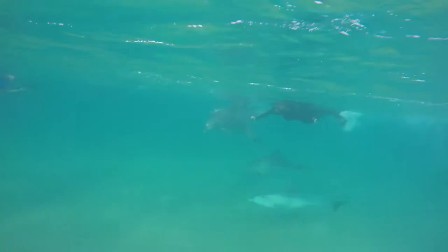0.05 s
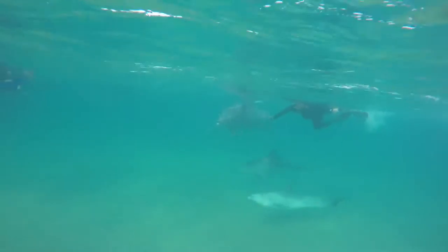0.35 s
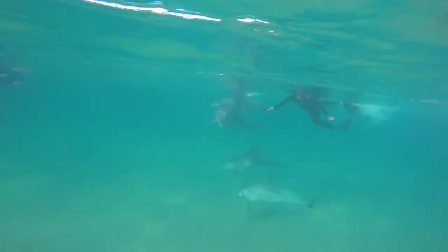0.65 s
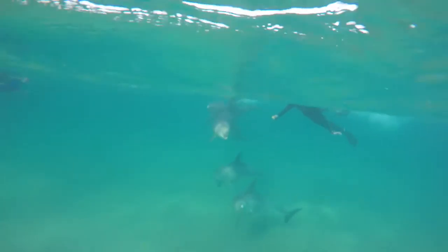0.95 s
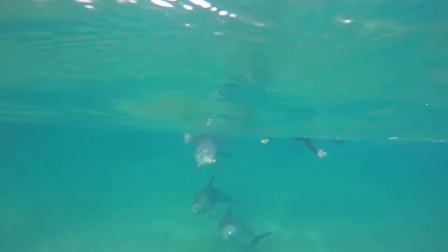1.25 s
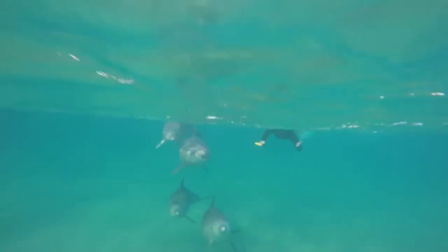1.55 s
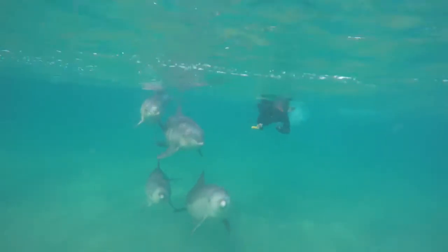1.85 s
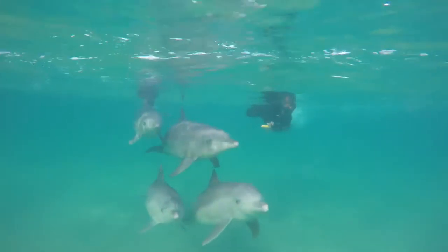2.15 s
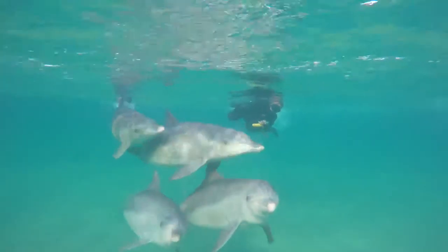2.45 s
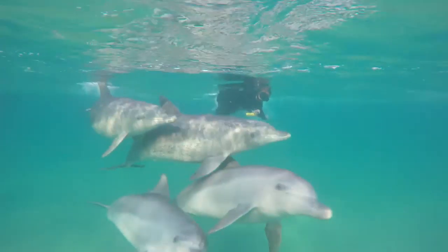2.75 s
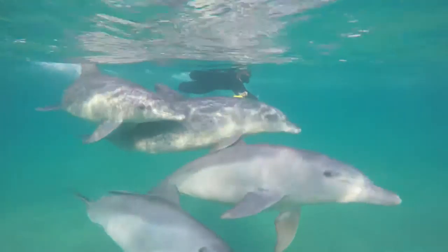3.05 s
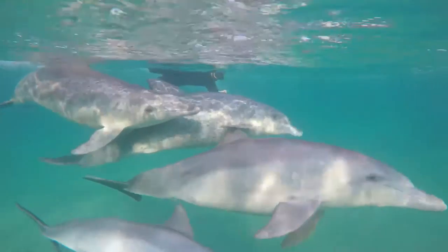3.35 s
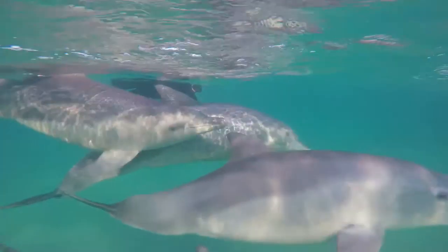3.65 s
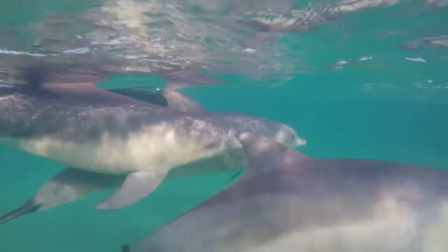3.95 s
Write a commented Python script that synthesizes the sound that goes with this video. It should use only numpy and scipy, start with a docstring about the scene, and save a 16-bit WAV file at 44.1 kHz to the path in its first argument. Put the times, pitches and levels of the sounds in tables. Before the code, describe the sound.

Dolphins click underwater over a steady low rumble and fine crackle. Bubbles plink close by around 0.8 seconds, then distant clicks and a thin whistle start near 1. From 1.4 a near click train builds, quickening into a buzz and stopping at 2.4, with a knock and gulping water at 1.8. A short squeak comes at 2.6; small bubbles and dull knocks follow around 3.5.

```python
"""First come a low rumble, a rush of water and a fine crackle, heard through a housing just under the sea
surface. Bubbles plink and gulp close by, each a pocket of air ringing at its own resonance. Dolphins
click far off, with a thin whistle; then a near one scans the housing with a train of pulses that speeds
up to a buzz and stops. A short squeak follows, and the water gurgles on."""
import sys
import numpy as np
from scipy import signal
from scipy.fft import rfft, irfft
from scipy.io import wavfile
from scipy.ndimage import map_coordinates

SR = 44100
rng = np.random.default_rng(int(sys.argv[2]) if len(sys.argv) > 2 else 0)


def inscribe(sig):
    """Save sig as 16-bit PCM at rate SR to the path in sys.argv[1].

    A 1-D sig is mono; a 2-D sig holds one channel per row.
    Samples are clipped to [-1, 1] before scaling.
    """
    pcm = np.round(np.clip(np.atleast_2d(sig).T, -1, 1) * 32767)
    wavfile.write(sys.argv[1], SR, pcm.astype(np.int16))


N = 176400
T = np.arange(N) / SR

# The near dolphin's pace. Each row: time in seconds, clicks per second.
CLICK_RATE = [(1.4, 105.3), (1.48, 113.6), (1.62, 111.0), (1.72, 101.8), (1.81, 98.4), (1.9, 107.8),
              (2.0, 122.9), (2.1, 148.1), (2.2, 178.7), (2.25, 189.4), (2.29, 189.1), (2.345, 179.5),
              (2.39, 134.4)]
# Its loudness as the beam finds the housing. Each row: time in seconds, level in dB.
BEAM_LEVEL = [(1.38, -70), (1.45, -59), (1.58, -56), (1.8, -54.5), (2.05, -49), (2.29, -47.5),
              (2.37, -51.5), (2.395, -71)]
# A click heard through the housing. Each row: frequency in Hz, relative density in dB.
CLICK_SPECTRUM = [(1200, -40), (1600, -23), (2100, -19), (2700, -3.5), (3300, 4), (3800, 9), (4450, -0.5),
                  (5000, -9.5), (5800, -7.5), (7400, -15), (8800, -18), (10500, -17.5), (12600, -23),
                  (14000, -17), (15500, -17)]
# Echoes of each click. Each row: delay in seconds, gain in dB.
ECHOES = [(.0013, -6), (.00235, -11), (.00325, -15)]
# Treble lobes of the beam. Each row: middle and width in seconds, frequency in Hz, level in dB.
BEAM_LOBES = [(2.16, 0.061, 9200, -80), (2.02, 0.084, 13850, -78)]
# Distant dolphins. Each row: time in seconds, clicks per second, level in dB.
FAR_CLICKS = [(.85, 81, -73), (1.0, 82, -56.5), (1.36, 85, -58.5), (1.81, 150, -51.5), (2.0, 130, -59),
              (2.3, 98, -55.5)]
# Their timbre. Each row: frequency in Hz, relative density in dB.
FAR_SPECTRUM = [(1250, -31), (1410, 1), (1550, 5), (2190, -4), (2390, 2.5), (3800, 4.5), (4950, -9.5),
                (5790, -8), (7550, -19.5), (15000, -24)]
# Pitch contours. Each row: time in seconds, frequency in Hz, base level in dB.
WHISTLE = [(.95, 5775, -92), (1.0, 5757, -61), (1.15, 5760, -65), (1.45, 5760, -77)]
SQUEAK = [(2.56, 2005, -71), (2.595, 1790, -54), (2.635, 1910, -58)]
BIG_BUBBLE = [(1.80, 139.4, -40), (1.84, 154.3, -27.5), (1.865, 157, -27), (1.89, 176, -30),
              (1.925, 194, -37.5), (1.98, 215, -59)]
FAINT_TONE = [(1.66, 726, -53.5), (1.8, 876, -56), (1.9, 829, -54)]
# Near bubbles, and snaps of the tiniest. Each row: start in seconds, peak in dB, frequency in Hz.
BUBBLES = [(.315, -56, 1503), (0.3285, -42.5, 3780), (0.354, -45.5, 3980), (0.416, -43.5, 3930),
           (.575, -43, 850), (0.7536, -26.5, 1557), (.755, -34.5, 520.6), (.783, -30, 534),
           (0.793, -47, 2760), (0.821, -48, 1500), (0.8383, -26.5, 2640), (0.8653, -36.5, 1570),
           (0.888, -41, 1490), (.895, -39, 3750), (0.904, -45.5, 3300), (0.918, -39, 3150),
           (0.989, -41, 3700), (2.961, -39, 2400), (3.3546, -46.5, 3170), (3.4062, -43, 2680),
           (3.4186, -48.5, 1565), (3.459, -49, 2640), (3.4728, -47.5, 1790), (3.5294, -49, 2360),
           (3.8915, -48, 2760), (3.937, -47.5, 3630)]
SNAPS = [(.053, -36.5, 5470), (0.7402, -41.5, 7760), (.761, -53, 7650), (.808, -50, 7000),
         (0.84, -51, 8900), (3.138, -47, 6000)]
# An air pocket. Each row: start in seconds, peak in dB, frequency in Hz, T60 and rise in seconds.
GULPS = [(1.787, -24, 578, 0.098, 0.0027), (1.829, -27.5, 664, 0.054, 0.0043),
         (1.87, -32, 650, 0.04, 0.0033), (1.896, -32, 671, 0.11, 0.0086), (1.947, -35, 660, 0.042, 0.0045),
         (2.1, -34.5, 601.3, .17, 0.017), (2.285, -42.5, 612, 0.15, 0.015), (2.38, -46.5, 615, 0.52, 0.012)]
# Knocks on the housing. Each row: start in seconds, peak in dB, frequency in Hz, T60 in seconds.
KNOCKS = [(.836, -37.5, 253, 0.087), (1.786, -17.5, 150, 0.024), (3.4625, -27.5, 294, 0.013),
          (3.581, -22, 82, 0.15)]
# Rushes of water. Each row: start and length in seconds, body and froth levels in dB before the sag.
CHURNS = [(0, 0.35, -42, -68), (0.742, 0.26, -39.5, -52), (1.772, 0.855, -37, -63), (3.358, 0.38, -53, -59)]
# Surges of water. Each row: middle in seconds, peak in dB, frequency in Hz, width in seconds.
SURGES = [(.624, -13.5, 27.3, 0.036), (0.72, -13, 47.4, 0.0094), (0.859, -17.5, 26.8, 0.027),
          (2.13, -20.5, 63.3, 0.023)]
# Spectra of the water's noises. Each row: frequency in Hz, relative density in dB.
CHURN_SPECTRUM = [(110, 8), (170, 0.5), (250, -5.5), (340, -3.5), (480, -11), (560, -2), (615, 7),
                  (690, -8.5), (790, -14.5)]
RUMBLE_SPECTRUM = [(15, 5.5), (65, -3.5), (118, -17), (162, -34), (194, -30), (273, -42.5), (450, -54)]
SLOSH_SPECTRUM = [(200, -4), (450, -4.5), (620, 5.5), (850, -2.5), (1000, -17), (1250, -44.5)]
FIZZ_SPECTRUM = [(590, -47), (1000, -7), (1360, -12), (1540, -2), (2190, -12), (2420, -1.5), (3110, -5),
                 (3890, -5.5), (4940, -16.5), (5860, -14), (7100, -20.5), (13200, -22), (15000, -29)]
# Their envelopes. Each row: time in seconds, gain in dB.
RUMBLE_LEVEL = [(0, -30.5), (.5, -27), (.85, -23.5), (1.4, -28), (3.2, -29), (4, -33.5)]
SLOSH_LEVEL = [(0, -61), (.6, -56), (1.75, -56.5), (2.7, -59), (2.85, -53), (3.4, -51), (4, -55)]
FIZZ_LEVEL = [(0, -55), (.55, -57), (.9, -52), (1.3, -55.5), (2.8, -56), (3.4, -53.5), (3.75, -55.5)]


def near_dolphin():
    """Multipath interference: delayed copies colour each click, and shift as the dolphin nears and turns."""
    start_s, closest_s, ring_hz = 1.3787, 2.3, 2802
    train = pulses(curve(CLICK_RATE) * (T > start_s))
    dull = signal.sosfiltfilt(signal.butter(2, 5560, fs=SR, output="sos"), train)
    treble = train - dull
    away_s = np.maximum(closest_s - T, 0)
    echoes = sum(amp(db) * delayed(dull, delay * (1 + .07 * away_s * drift(hz=30)))
                 for delay, db in ECHOES)
    # A second path round the housing shortens as the dolphin turns.
    detour = amp(-7) * delayed(treble, .000853 * (1 + .1 * away_s))
    ringing = signal.oaconvolve(train, plink(-28, ring_hz, t60=0.027, rise=1 / ring_hz))[:N]
    smear = amp(-15) * scatter(dull, t60=0.033)
    clicks = unit(filtered(train + detour + echoes + ringing + smear, CLICK_SPECTRUM))
    return level(BEAM_LEVEL) * clicks + beam_lobes(treble)


def beam_lobes(treble):
    """Directivity: narrow treble bands swell and fade as lobes of the beam sweep over the housing."""
    rise_hz_per_s = 1000
    out = np.zeros(N)
    for s, width, hz, db in BEAM_LOBES:
        band = resonate(treble, hz + rise_hz_per_s * (T - s), width_hz=120)
        out += amp(db) * swell(s, width) * unit(band)
    return out


def far_dolphins():
    """Reverberation: scattering in the water smears uneven trains of distant clicks."""
    rate = curve(FAR_CLICKS) * (1 + .03 * drift(hz=27.8))
    train = pulses(rate) * amp(1.8 * drift(hz=49.5))
    smear = amp(7) * scatter(train, t60=0.1)
    return level(FAR_CLICKS) * unit(filtered(train + smear, FAR_SPECTRUM))


def calls():
    """Harmonic series: one partial makes a thin whistle, three fluttering ones a squeak."""
    return tone(WHISTLE, waver_db=0) + tone(SQUEAK, waver_db=7, harmonics_db=(-8, 1, -17))


def bubbles():
    """Bubble resonance: each pinches off with a brief crack, then rings on the springiness of its air."""
    rings, cracks = np.zeros((2, N))
    pinch_s = .002
    pinch = amp(-10) * np.exp(-T[T < 10 * pinch_s] / pinch_s)
    for s, db, hz in BUBBLES:
        add(rings, s, plink(db, hz, t60=63 / hz, rise=4.5 / hz, glide_per_s=.25))
        add(cracks, s, amp(db) * pinch)
    for s, db, hz in SNAPS:
        add(rings, s, plink(db, hz, t60=0.0032, rise=0.00021))
        add(cracks, s, amp(db) * pinch)
    return rings + cracks * noise(FIZZ_SPECTRUM)


def big_bubble():
    """The resonance of a big bubble rises in pitch as it lifts off."""
    return tone(BIG_BUBBLE, waver_db=1, harmonics_db=(0, -16))


def gulps_and_knocks():
    """Damped free vibration: an air pocket gulps at the housing, and knocks on it ring dully."""
    out = np.zeros(N)
    for s, db, hz, t60, rise in GULPS:
        add(out, s, plink(db, hz, t60, rise))
    for s, db, hz, t60 in KNOCKS:
        add(out, s, plink(db, hz, t60, rise=0.0032))
    return out


def churn():
    """Resonant noise and a froth of small bubbles share an envelope: each rush swells, sags and stops."""
    attack_s, release_s, sag_db_per_s = 0.0081, 0.21, 13
    body, froth = np.zeros((2, N))
    for s, length, body_db, froth_db in CHURNS:
        attack = np.clip((T - s) / attack_s, 0, 1)
        release = np.clip((s + length - T) / release_s, 0, 1)
        envelope = attack * release * amp(-sag_db_per_s * (T - s))
        body += amp(body_db) * envelope
        froth += amp(froth_db) * envelope
    return body * noise(CHURN_SPECTRUM) + froth * swarm(per_s=680, band_hz=(1460, 4250), spread_db=3)


def water():
    """Pressure fluctuations: water thuds and surges against the housing and sloshes at the surface."""
    rumble = amp(curve(RUMBLE_LEVEL)) * unit(noise(RUMBLE_SPECTRUM) * amp(2.2 * drift(hz=16)))
    for s, db, hz, width in SURGES:
        rumble += amp(db) * swell(s, width) * np.sin(2 * np.pi * hz * (T - s))
    slosh = amp(curve(SLOSH_LEVEL)) * unit(noise(SLOSH_SPECTRUM) * amp(2.7 * drift(hz=35)))
    return rumble + slosh


def sea_fizz():
    """Incoherent addition: tiny bubbles merge into a crackle over smooth hiss and sparser ticks."""
    ticks = amp(-74) * swarm(per_s=200, band_hz=(4530, 13300), spread_db=2.5)
    hiss = amp(-6) * noise(FIZZ_SPECTRUM)
    crackle = amp(-9.5) * swarm(per_s=500, band_hz=(1514, 13100), spread_db=3)
    return ticks + amp(curve(FIZZ_LEVEL)) * (hiss + crackle)


def swarm(per_s, band_hz, spread_db, pitches=30):
    """A Poisson process: tiny bubbles ring at random times and strengths, heard through the housing."""
    grains = np.zeros(N)
    for hz in np.geomspace(*band_hz, pitches):
        onsets = rng.random(N) < per_s / pitches / SR
        strength = amp(spread_db * np.minimum(rng.exponential(1, N), 4))
        grains += signal.oaconvolve(onsets * strength, plink(0, hz, t60=45 / hz, rise=1.46 / hz))[:N]
    return unit(filtered(grains, FIZZ_SPECTRUM))


def plink(db, hz, t60, rise, glide_per_s=0):
    """A damped oscillator with a soft start and an optional pitch glide."""
    t = np.arange(0, t60 + 4 * rise, 1 / SR)
    envelope = (1 - np.exp(-(t / rise) ** 2)) * np.exp(-np.log(1000) * t / t60)
    phase = 2 * np.pi * hz * (t + glide_per_s * t ** 2 / 2)
    return amp(db) * envelope / envelope.max() * np.sin(phase)


def tone(contour, waver_db, harmonics_db=(0,)):
    """Modulation: harmonics follow a pitch contour while their level wavers at random."""
    phase = 2 * np.pi * np.cumsum(curve(contour)) / SR
    harmonics = sum(amp(db) * np.sin(k * phase) for k, db in enumerate(harmonics_db, 1))
    return level(contour) * amp(waver_db * drift(hz=39.7)) * harmonics


def pulses(rate):
    """Band-limited impulses, one per cycle of a moving rate, of mean power about 1."""
    cycles = np.cumsum(rate) / SR
    at = np.flatnonzero(np.diff(np.floor(cycles[:-32])) > 0)
    exact = at + (np.ceil(cycles[at]) - cycles[at]) * SR / rate[at]
    taps = at[:, None] + np.arange(-8, 9)
    out = np.zeros(N)
    out[taps] = np.sinc(taps - exact[:, None]) * np.hanning(17) * np.sqrt(SR / rate[at])[:, None]
    return out


def scatter(x, t60):
    """Diffuse reflection: the rippling surface gives every click a new tail of noise."""
    fade = np.exp(-2 * np.log(1000) / (t60 * SR))
    power = signal.lfilter([1 - fade], [1, -fade], x ** 2)
    return np.sqrt(power + 1e-20) * rng.standard_normal(N)


def delayed(x, s):
    """Propagation delay of s seconds, varying with time."""
    return map_coordinates(x, [(T - s) * SR])


def resonate(x, hz, width_hz):
    """A resonance whose centre follows a curve."""
    carrier = np.exp(2j * np.pi * np.cumsum(hz) / SR)
    pole = np.exp(-np.pi * width_hz / SR)
    return (carrier * signal.lfilter([1 - pole], [1, -pole], x / carrier + 1e-18)).real


def filtered(x, spectrum, size=4096):
    """Minimum-phase filtering: the ringing follows each click and never precedes it."""
    log_gain = np.log(spectral_gain(spectrum, abs(np.fft.fftfreq(size, 1 / SR))))
    response = np.exp(np.conj(signal.hilbert(log_gain)))
    return signal.oaconvolve(x, np.fft.ifft(response).real[:size // 2])[:N]


def noise(spectrum):
    """Spectral shaping of white noise, at rms 1."""
    gain = spectral_gain(spectrum, np.fft.rfftfreq(N, 1 / SR))
    return unit(irfft(rfft(rng.standard_normal(N)) * gain, N))


def drift(hz):
    """Random fluctuation slower than about hz, at rms 1."""
    rolloff = 1 + (np.fft.rfftfreq(N, 1 / SR) / hz) ** 4
    return unit(irfft(rfft(rng.standard_normal(N)) / rolloff, N))


def spectral_gain(spectrum, hz):
    """Frequency response at hz, falling 40 dB per octave past the table's ends."""
    points_hz, db = np.transpose(spectrum)
    octave, points = np.log2(hz + 1), np.log2(points_hz + 1)
    outside = abs(octave - np.clip(octave, points[0], points[-1]))
    return amp(np.maximum(np.interp(octave, points, db) - 40 * outside, -100))


def swell(s, width):
    """Gaussian envelope centred on time s."""
    return np.exp(-((T - s) / width) ** 2)


def curve(rows, column=1):
    """Linear interpolation of a time table at every sample."""
    rows = np.array(rows)
    return np.interp(T, rows[:, 0], rows[:, column])


def level(rows):
    """Envelope from a table's last column, silent outside its span."""
    return amp(curve(rows, column=-1)) * (T >= rows[0][0]) * (T <= rows[-1][0])


def amp(db):
    """Decibels to amplitude ratio."""
    return 10 ** (np.asarray(db) / 20)


def unit(x):
    """Normalisation to rms 1."""
    return x / np.sqrt(np.mean(x ** 2) + 1e-20)


def add(mix, s, sound):
    """Superposes a sound at time s."""
    part = mix[max(round(s * SR), 0):][:len(sound)]
    part += sound[:len(part)]


def scene():
    """Superposition: all pressures add at one underwater microphone."""
    dolphins = near_dolphin() + far_dolphins() + calls()
    background = tone(FAINT_TONE, waver_db=2) + water() + churn() + sea_fizz()
    close = bubbles() + big_bubble() + gulps_and_knocks()
    return (dolphins + close + background)[None]


def record(dry):
    """Band limiting: a steep low-pass filter removes the highest treble."""
    lowpass = signal.firwin(401, cutoff=15600, window=("kaiser", 9), fs=SR)
    return signal.oaconvolve(dry, lowpass[None], "same")


dry = scene()
out = record(dry)
inscribe(out)
```